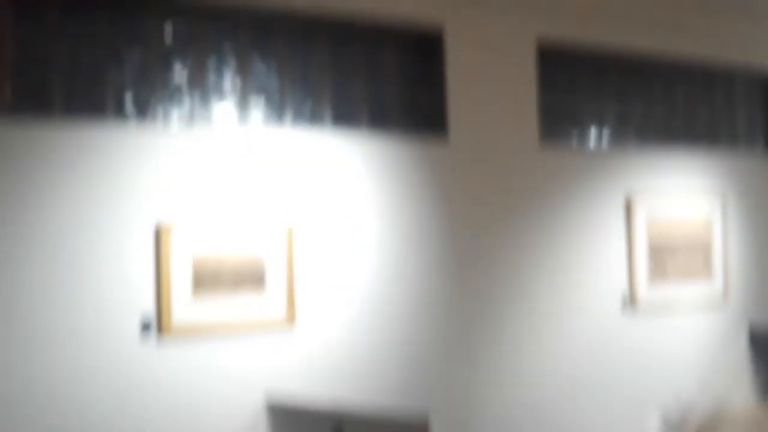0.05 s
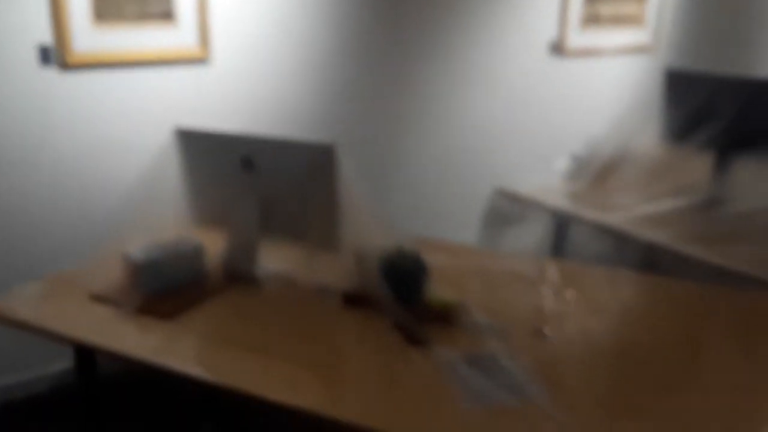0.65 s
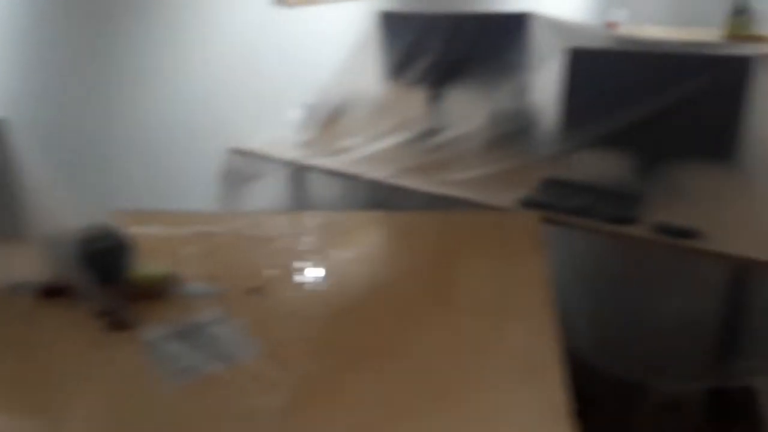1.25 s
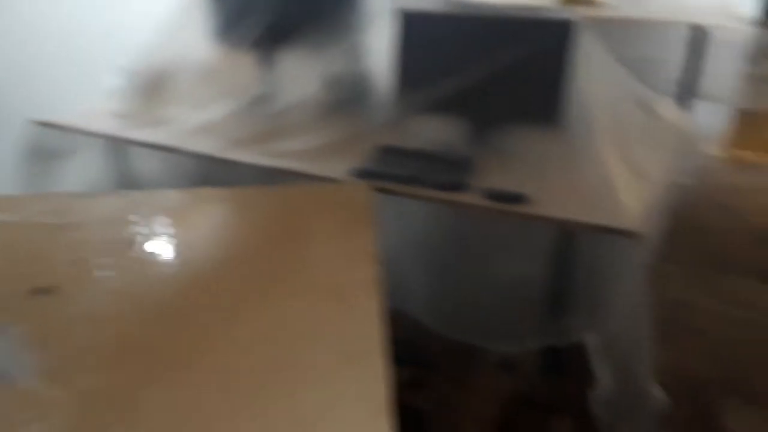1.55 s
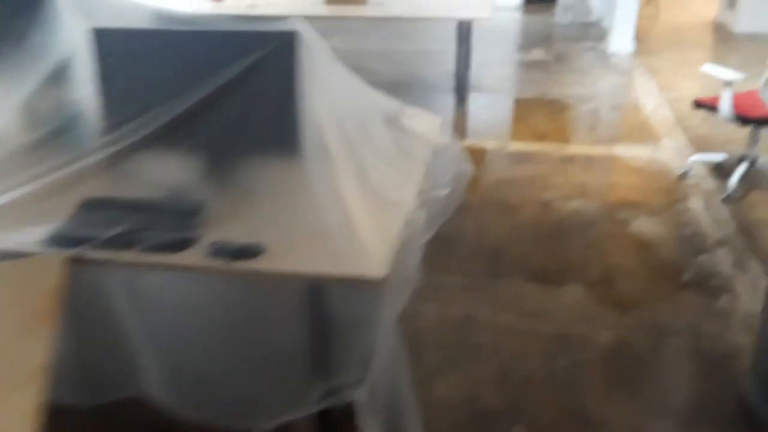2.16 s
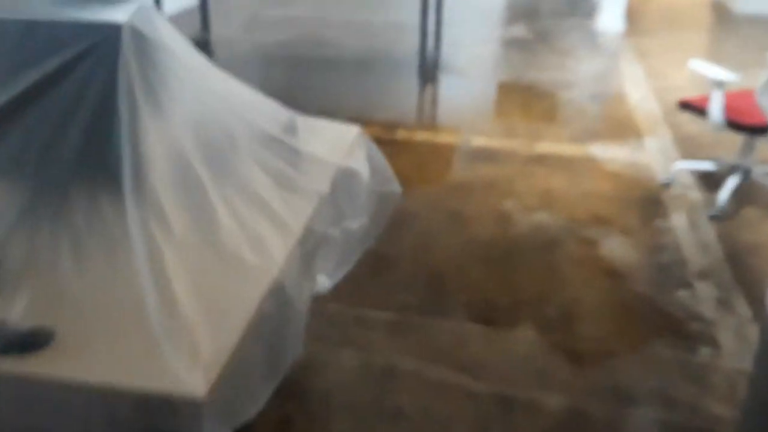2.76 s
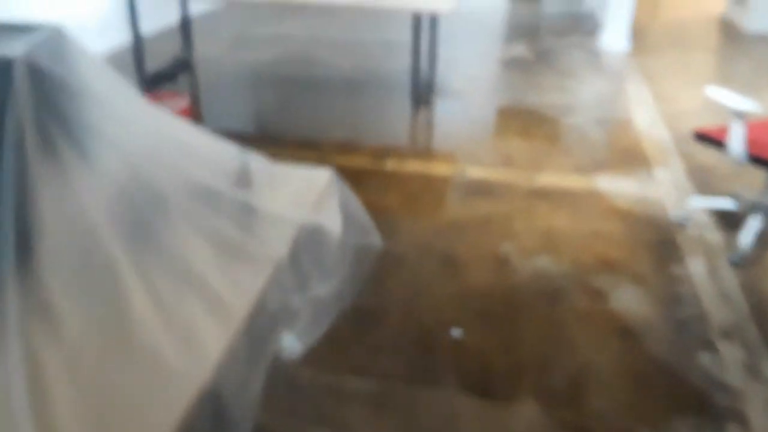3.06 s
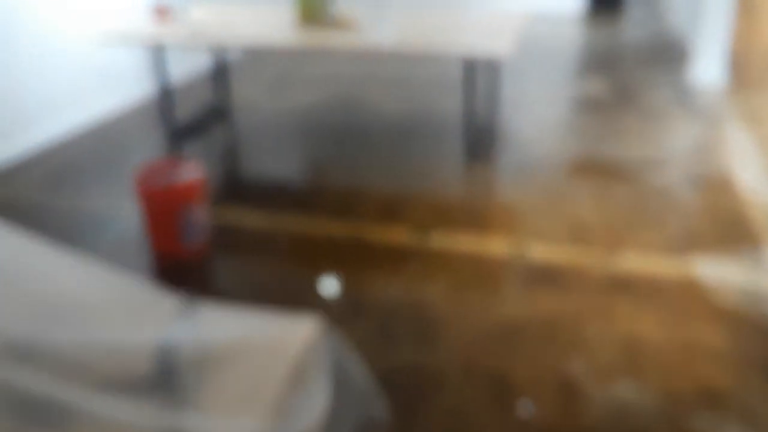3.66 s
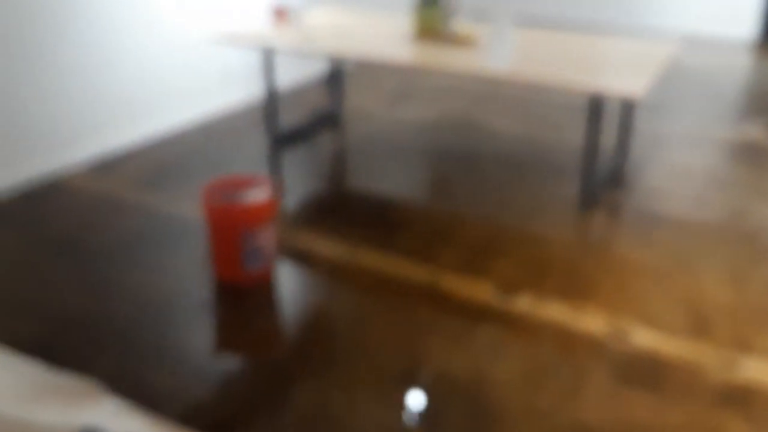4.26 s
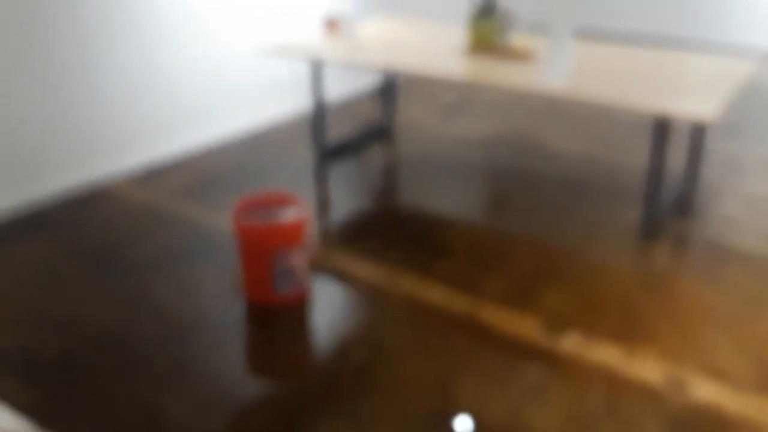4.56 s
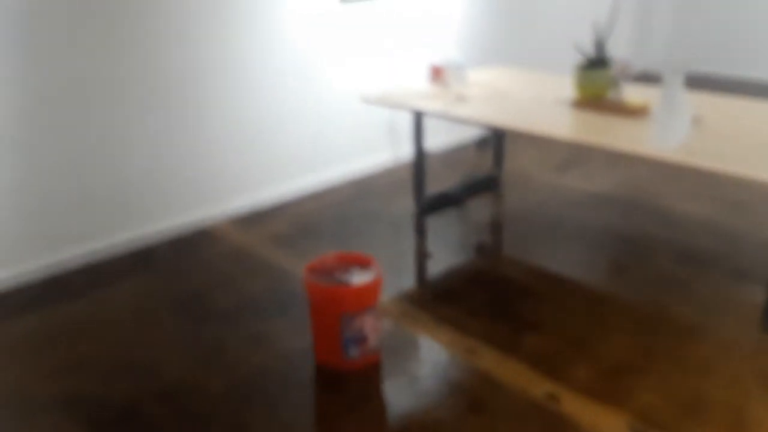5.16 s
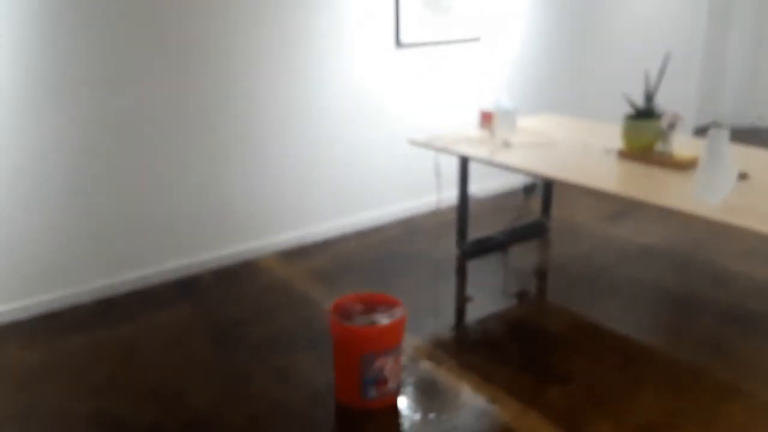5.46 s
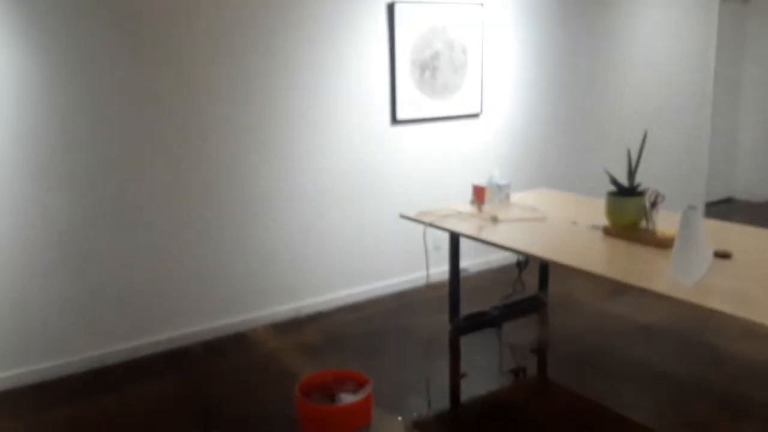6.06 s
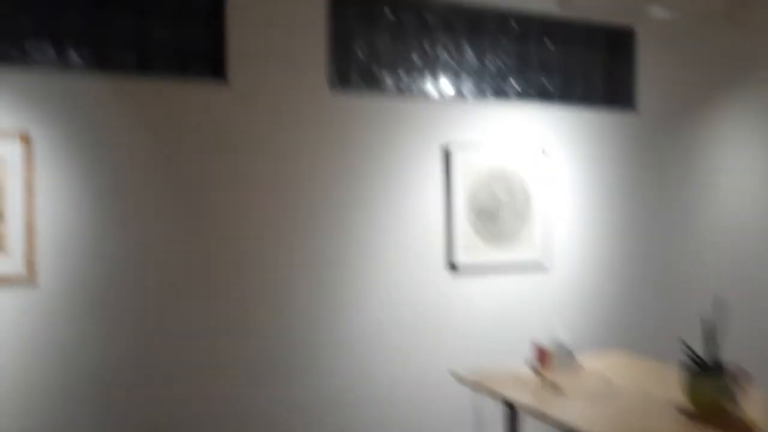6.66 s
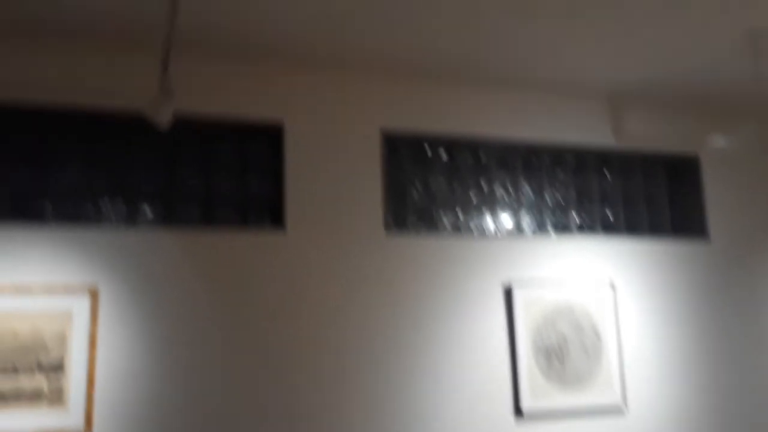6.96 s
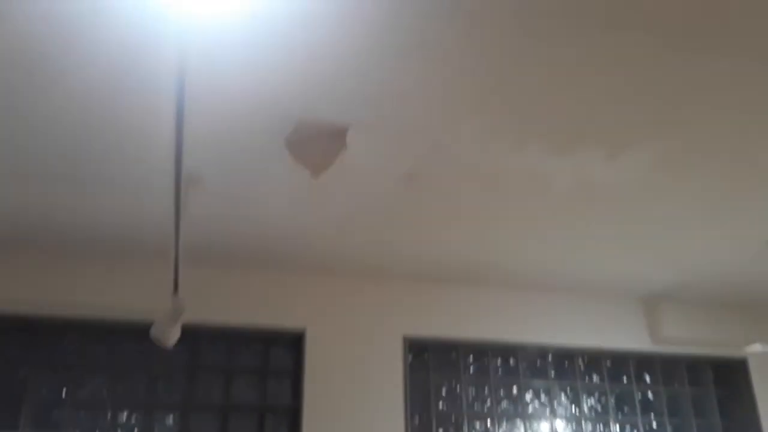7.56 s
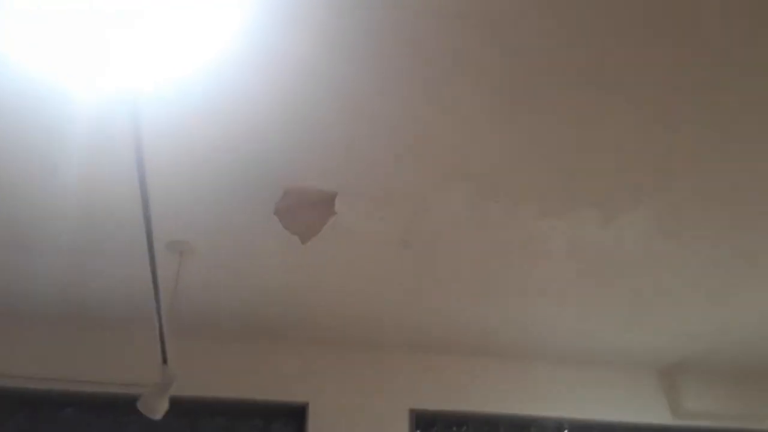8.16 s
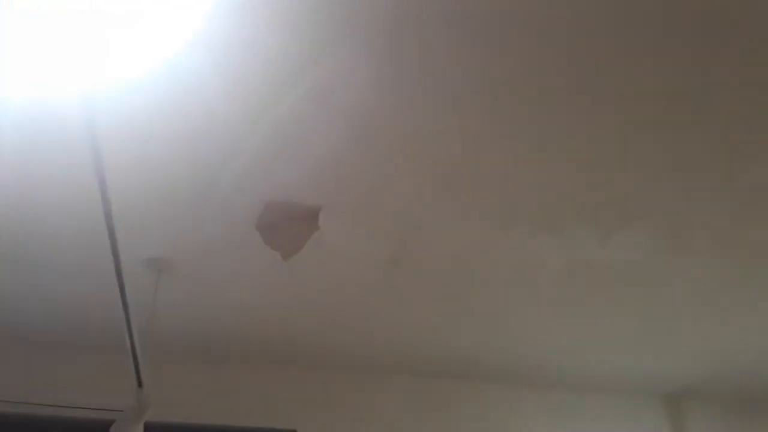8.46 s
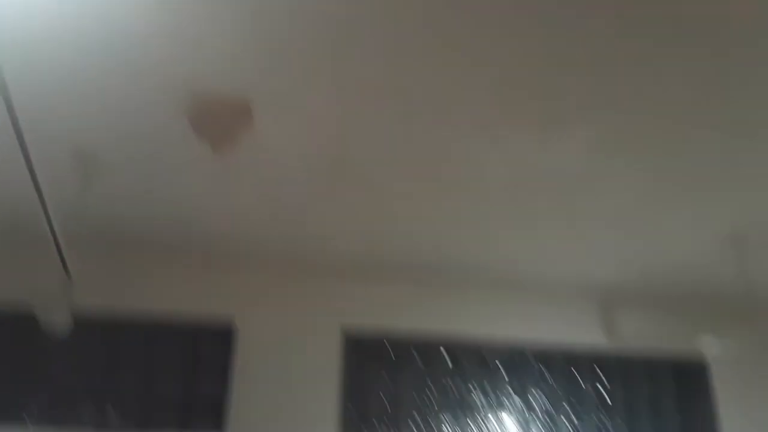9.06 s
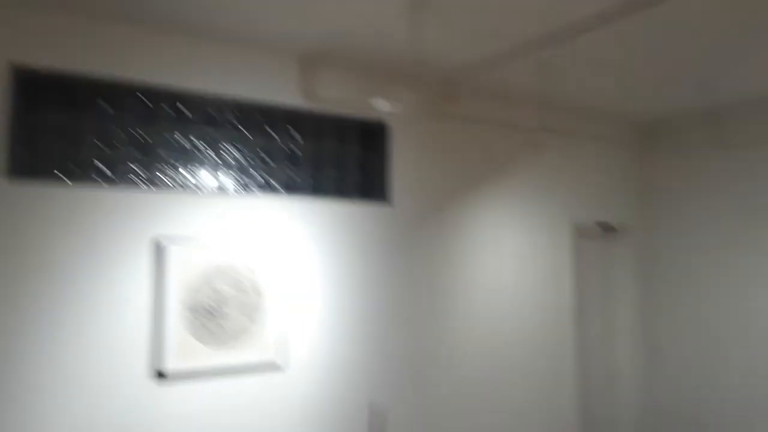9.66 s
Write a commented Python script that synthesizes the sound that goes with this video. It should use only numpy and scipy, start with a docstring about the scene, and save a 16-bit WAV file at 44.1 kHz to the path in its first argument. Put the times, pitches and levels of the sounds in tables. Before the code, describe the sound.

Water showers and spatters on a floor and plastic sheeting in a large room, with close drips and plinks into a bucket.

```python
"""A large, hard-floored room with a leaking ceiling, heard through a pair of microphones.
Ventilation rumbles and hums behind a far shower of water on the wet floor and plastic sheeting.
Across the room drops plink into a bucket, splashes drum on the sheeting and something squeaks once.
Heavier dribbles spatter in bursts and trap chirping bubbles in the puddles.
Close to the microphones, single drops tick on the plastic, slap the floor and smack."""
import sys
import numpy as np
from scipy import signal
from scipy.fft import rfft, irfft, next_fast_len
from scipy.io import wavfile

SR = 44100
rng = np.random.default_rng(int(sys.argv[2]) if len(sys.argv) > 2 else 0)


def to_wav(sig):
    """Store sig (one row per channel, or 1-D mono) as 16-bit WAV at the path in sys.argv[1].

    Samples outside -1..1 are clipped; the rate is SR.
    """
    pcm = np.clip(np.atleast_2d(sig), -1, 1) * 32767
    pcm = np.round(pcm).astype(np.int16)
    wavfile.write(sys.argv[1], SR, pcm.T)  # frames by channels


N = 437472
TIME = np.arange(N) / SR
SPATTER_LEAD_MS, FAR_DROP_PAN_DB = 0.33, -5   # spatter reaches the left microphone first; pan is left - right


def from_db(db):
    """Decibels to gain."""
    return 10 ** (np.asarray(db) / 20)


def unit_mid(x):
    """Scale a stereo sound so that its middle has rms 1."""
    return x / np.sqrt(np.mean(x.mean(0) ** 2) + 1e-20)


def in_time(rows):
    """The columns of a curve table at every sample."""
    times, *columns = np.transpose(rows)
    return [np.interp(TIME, times, column) for column in columns]


def at_hz(points, hz):
    """Read a table on a log-frequency axis."""
    f, value = np.transpose(points)
    return np.interp(np.log(hz + 1e-3), np.log(f), value)


def filtered(x, gain):
    """Apply a gain that is a function of frequency."""
    size = next_fast_len(N + 4096, True)
    return irfft(rfft(x, size) * gain(np.fft.rfftfreq(size, 1 / SR)), size)[..., :N]


def coloured(x, spectrum):
    """Shape a sound by a table of f/Hz, level/dB."""
    return filtered(x, lambda hz: from_db(at_hz(spectrum, hz)))


def bandpass(x, low_hz, high_hz):
    """One gently sloped band of a sound."""
    return signal.sosfilt(signal.butter(2, [low_hz, high_hz], "band", fs=SR, output="sos"), x)


def drift(rate_hz):
    """A slow random wander with spread 1."""
    hop, settle = 100, 1000
    pole = np.exp(-2 * np.pi * rate_hz * hop / SR)
    noise = rng.standard_normal(N // hop + settle + 2)
    slow = signal.lfilter([1], [1, -2 * pole, pole * pole], noise)[settle:]
    return np.interp(np.arange(N) / hop, np.arange(len(slow)), slow / slow.std())


def by_chance(per_s, mean_db, range_hz, spread_db):
    """Minor events at random moments: rows of t/s, level/dB, f/Hz."""
    when, size, pitch = rng.random((round(per_s * N / SR), 3)).T
    low, high = range_hz
    return list(zip(when * N / SR, mean_db + spread_db * (2 * size - 1), low * (high / low) ** pitch))


def impacts(per_s, spread_db, size=N):
    """Random droplet impacts of uneven strength, each from its own direction."""
    at = np.flatnonzero(rng.random(size) < per_s / SR)
    strength = np.minimum(rng.exponential(1, size)[at], 3.5)
    height = from_db(spread_db * strength) * rng.choice([-1, 1], size)[at]
    lag = rng.integers(-18, 19, size)[at]   # samples between the microphones
    out = np.zeros((2, size))
    out[0, at] = height
    out[1, (at + lag) % size] = height
    return out


def place(out, s, sound, pan_db=0, lead_ms=0):
    """Add a mono sound at a time and a side; the left microphone may hear it first."""
    sides = from_db(np.array([pan_db, -pan_db]) / 2)
    for channel, gain, early_s in zip(out, sides / sides.mean(), (lead_ms / 1000, 0)):
        at = min(max(round((s - early_s) * SR), 0), N)
        channel[at:at + len(sound)] += gain * sound[:N - at]


def ping(hz, t60, rise_s, glide=0):
    """A damped sine that swells briefly and climbs by a share of its pitch as it dies; peak 1."""
    t = TIME[:SR // 3]
    envelope = from_db(-60 * t / t60) * (1 - np.exp(-t / rise_s)) ** 2
    wave = envelope * np.sin(2 * np.pi * hz * t * (1 + glide * t / t60 / 2))
    return wave / np.abs(wave).max()


# how alike the two microphones hear far sound: f/Hz, correlation
MIC_LIKENESS = [(60, .92), (180, .93), (370, .88), (700, .76), (1000, .15), (1400, -.3), (2500, -.05),
                (5000, 0)]


def diffuse_noise():
    """Noise from all sides: alike at both microphones in the bass, unlike in the treble."""
    noise = rng.standard_normal((2, N))
    mid = filtered(noise[0], lambda hz: np.sqrt(1 + at_hz(MIC_LIKENESS, hz)))
    side = filtered(noise[1], lambda hz: np.sqrt(1 - at_hz(MIC_LIKENESS, hz)))
    return np.array([mid + side, mid - side])


# decay of the large room: f/Hz, t60/s
ROOM_DECAY = [(200, 0.35), (1000, 1), (3000, 0.95), (8000, 0.32), (16000, 0.2)]


def room(x, first_echo_s=0.0038):
    """Reverberation of unit energy: scattered early echoes thicken into a tail whose treble dies first."""
    t = TIME[:SR * 3 // 4]
    echoes = rng.standard_normal((2, len(t))) * (t > first_echo_s)
    echoes *= rng.random((2, len(t))) < .03 + (t / .08) ** 2
    echoes /= np.sqrt(np.minimum(0.012 + (t / 0.046) ** 2, 1))   # the early ones are stronger
    edges, response = np.geomspace(40, 18000, 8), 0
    for low, high in zip(edges, edges[1:]):
        t60 = at_hz(ROOM_DECAY, np.sqrt(low * high))
        response += bandpass(echoes, low, high) * from_db(-60 * t / t60)
    response /= np.sqrt((response ** 2).sum(1, keepdims=True))
    return signal.fftconvolve(x.mean(0, keepdims=True), response, axes=1)[:, :N]


def far_rings(rows, swell_share, direct_db, room_db, glide=0):
    """Pitched rings from across the room; the longer ones also swell more slowly."""
    out = np.zeros((2, N))
    for s, db, hz, t60 in rows:
        place(out, s, from_db(db) * ping(hz, t60, swell_share * t60, glide))
    return from_db(direct_db) * out + from_db(room_db) * room(out)


def smacks(rows, ring_cycles, rise_cycles, gain_db, room_db):
    """Drops land: each a short pitched pulse from its own side, then the room."""
    out = np.zeros((2, N))
    for s, db, hz, pan_db, lead_ms in rows:
        pulse = ping(hz, ring_cycles / hz, rise_cycles / hz)
        place(out, s, from_db(db + gain_db) * pulse, pan_db, lead_ms)
    return out + from_db(room_db) * room(out)


# ventilation, all around the microphones: f/Hz, relative level/dB
VENT_SPECTRUM = [(15, -56), (25, -30), (43, -32), (75, -11.5), (112, 1.5), (196, -1), (237, 2), (283, -1),
                 (346, 2), (520, -5), (680, -61), (1140, -120)]


def ventilation(rumble_db=-51.77, mains_hz=59.3, drone_hz=96, nearest_s=2.9, pass_s=1.3):
    """Steady air rumble; its hum swells and fades along the microphones' way through the room."""
    rumble = from_db(rumble_db) * unit_mid(coloured(diffuse_noise(), VENT_SPECTRUM))
    nearness = np.exp(-((TIME - nearest_s) / pass_s) ** 2)
    tones = [(mains_hz, -75 + 9 * nearness),
             (2 * mains_hz, -63.5 - 0.96 * TIME),   # the octave recedes slowly
             (drone_hz, -58.5 - 7 * TIME)]   # the drone is soon left behind
    hum = sum(from_db(db - drift(1.0)) * np.sin(2 * np.pi * hz * TIME) for hz, db in tones)
    return rumble + np.sqrt(2) * hum


# how hard the ceiling leaks: t/s, shower level/dB, drizzle relative level/dB
LEAK_FLOW = [(0.0, -34, -39.5), (0.44, -36, -50.5), (1.49, -37.5, -42.5), (2.57, -35.5, -44.5),
             (3.06, -36, -46), (4.69, -35.5, -47), (6.05, -37, -43), (6.27, -35, -47), (6.88, -36, -47),
             (7.76, -37.5, -40), (9.56, -35, -46), (9.92, -38, -43)]
# the shower, far off in the room: f/Hz, relative level/dB
SHOWER_SPECTRUM = [(30, -42), (250, -23), (540, -11.5), (720, -7), (1050, -5), (1400, -0.95), (1900, 1.5),
                   (2200, 2.5), (2550, 1), (3050, 2.5), (4100, -0.2), (4900, -2.6), (5750, -3), (8070, -11),
                   (9400, -17), (11460, -16), (13320, -15), (14980, -21)]


def shower(grain_db=-9.0, flicker_db=0.72):
    """Countless far drops merge into a wash; the nearer ones stay grains, each in a band of its own."""
    edges, grains = np.geomspace(900, 16000, 10), 0
    for low, high in zip(edges, edges[1:]):
        grains += bandpass(unit_mid(impacts(per_s=75, spread_db=4.0)) + 1e-18, low, high)
    wash = unit_mid(diffuse_noise()) + from_db(grain_db) * grains
    level_db = in_time(LEAK_FLOW)[0] + flicker_db * drift(8.0)
    return from_db(level_db) * unit_mid(coloured(wash, SHOWER_SPECTRUM))


# fine spray landing out in the room: f/Hz, relative level/dB
SPRAY_SPECTRUM = [(2000, -20.5), (3500, -2), (5000, 2), (6500, -1), (8000, -0.5), (9500, -10),
                  (12500, -5.5), (16000, -14)]


def drizzle(mean_db=-46, flow_follow=1.17, flicker_db=2.0):
    """The finest droplets fizz on the sheeting, louder and softer with the flow."""
    flow_db = in_time(LEAK_FLOW)[1]
    fizz = unit_mid(coloured(impacts(per_s=4000, spread_db=-0.5), SPRAY_SPECTRUM))
    return from_db(mean_db + flow_follow * (flow_db - flow_db.mean()) + flicker_db * drift(11.0)) * fizz


# splashes on the sheeting across the room: t/s, relative level/dB, f/Hz, t60/s
SHEETING_THUDS = [(2.246, -35.5, 660, 0.05), (2.262, -39, 400, 0.022), (2.265, -41, 243, 0.18),
                  (2.274, -36, 317, 0.07), (3.020, -42, 235, 0.13), (3.770, -41, 238, .15),
                  (6.25, -44, 391, .2), (7.0635, -29.5, 710, 0.012), (7.064, -29, 1210, 0.0073),
                  (7.110, -46, 64.6, .07), (8.129, -36, 1340, .015), (8.472, -28, 1120, .012),
                  (8.66, -46, 366, .25)]


def sheeting():
    """Heavy splashes set the plastic sheeting ringing like a slack drum."""
    return far_rings(SHEETING_THUDS, swell_share=0.05, direct_db=-4.0, room_db=-4.5)


# bucket and puddles across the room: t/s, relative level/dB, f/Hz, t60/s
BUCKET_PLINKS = [(2.270, -28, 1330, .04), (2.645, -22, 3050, 0.045), (2.688, -23, 2980, .05),
                 (3.165, -32, 860, 0.035), (3.594, -22.5, 3370, .06), (3.775, -37, 1010, 0.063),
                 (4.438, -28, 1360, 0.069), (4.624, -25, 876, 0.025), (4.634, -31, 1200, .03),
                 (4.638, -29, 1010, 0.035), (4.666, -35, 940, .05), (4.997, -22, 2400, .025),
                 (5.027, -24, 2280, .025), (5.045, -24, 2260, .03), (5.065, -26, 2230, .025),
                 (5.232, -21, 2200, .025), (5.262, -25, 2230, .025), (5.363, -29, 2250, 0.022),
                 (6.319, -22, 1850, .025), (6.408, -20, 2150, .03), (6.419, -21, 2060, .025),
                 (6.477, -29, 2140, .02), (6.539, -24, 2100, .02), (6.863, -25, 1347, 0.031),
                 (7.032, -24, 2780, 0.035), (8.130, -21, 2600, .025)]


def bucket():
    """Drops trap bubbles that ring and rise slightly in pitch."""
    return far_rings(BUCKET_PLINKS, swell_share=0.06, direct_db=-8.0, room_db=-11.5, glide=0.066)


def squeak(start_s=0.911, length_s=0.084, lowest_hz=694, swell_db=7, rough_db=4.0, room_db=-11):
    """A hollow squeak, as of a sole on the wet floor: it dips in pitch, swells and stops at once."""
    out = np.zeros((2, N))
    along = np.linspace(-1, 1, round(length_s * SR))
    hz = lowest_hz * (1 + .11 * along ** 4)
    level_db = -42 + swell_db * along + rough_db * drift(60)[:len(along)]
    envelope = from_db(level_db) * np.sqrt(1 - along ** 2)
    place(out, start_s, envelope * np.sin(2 * np.pi * np.cumsum(hz) / SR))
    return out + from_db(room_db) * room(out)


def spatter(grains, grain_share, colour):
    """One second of droplet impacts blended with smooth noise, then coloured."""
    wash = unit_mid(rng.standard_normal((2, SR)))
    blend = np.sqrt(grain_share) * unit_mid(grains) + np.sqrt(1 - grain_share) * wash
    return unit_mid(irfft(rfft(blend) * colour, SR))


# dribbles on floor and sheeting, out in the room: t/s, level/dB, f/Hz, spread/octaves, pouring/s
DRIBBLES = [(0.025, -33, 2540, 0.59, 0.018), (0.155, -44, 5680, 0.21, 0.027), (0.262, -37, 4150, 0.69, 0.2),
            (0.351, -35.5, 2230, 0.49, 0.0045), (0.703, -36, 3840, 0.74, 0.05),
            (0.83, -38.5, 2830, 0.7, 0.026), (0.898, -38.7, 2930, 0.19, 0.0),
            (1.174, -45, 4070, 0.53, 0.15), (1.322, -42, 4660, 0.37, 0.022),
            (1.701, -36.3, 2600, 0.37, 0.033), (1.945, -42, 2070, 0.45, 0.087),
            (2.085, -39, 1900, 0.31, 0.07), (2.219, -31.5, 2100, 0.46, 0.055),
            (2.425, -34.5, 2190, 0.69, 0.093), (2.521, -33.7, 2830, 0.66, 0.01),
            (2.64, -36, 2430, 0.51, 0.099), (2.75, -35.5, 2450, 0.54, 0.08),
            (3.368, -34.5, 3600, 0.48, 0.027), (3.59, -34.5, 2540, 0.84, 0.01),
            (3.68, -38.5, 2430, 0.49, 0.01), (3.76, -38, 2580, 0.91, 0.053),
            (3.949, -39, 3640, 0.23, 0.012), (4.135, -33.5, 2190, 0.53, 0.035),
            (4.172, -40.5, 2510, 0.83, 0.13), (4.412, -36, 3230, 0.82, 0.076),
            (4.503, -36.5, 2800, 0.35, 0.04), (4.645, -37, 3200, 0.31, 0), (4.76, -38.5, 2880, 0.28, 0.045),
            (4.987, -37.5, 2300, 0.2, 0.07), (5.2, -32.5, 3000, 0.72, 0.0089),
            (5.211, -37.5, 2250, 0.38, 0.09), (5.76, -48, 4900, 0.37, 0.0077),
            (6.06, -33, 2530, 0.67, 0.015), (6.14, -35, 2730, 0.53, 0.0016), (6.29, -35, 1970, 0.34, 0.16),
            (6.375, -40, 2140, 0.2, 0.05), (6.602, -35.5, 2860, 0.8, 0), (6.826, -44, 1770, 0.59, 0.079),
            (6.909, -41.5, 5500, .3, 0), (7.032, -38.5, 2000, 0.96, 0.05), (7.202, -38, 1960, 1.26, 0.055),
            (7.315, -39, 2100, 0.38, 0.078), (7.546, -42.2, 4800, 0.31, 0), (7.816, -41, 2140, 0.17, 0.0),
            (8.13, -42.5, 1970, 0.86, 0.039), (8.265, -42, 2160, 0.27, 0), (8.355, -42, 2290, 0.21, 0.16),
            (8.472, -45, 1700, 0.88, 0.11), (8.66, -45, 5830, 0.68, 0.0031), (8.957, -43, 2390, 0.3, 0.0),
            (9.152, -34, 3100, 0.59, 0.017), (9.483, -38, 4440, 0.64, 0.043),
            (9.655, -36, 3160, 0.76, 0.08), (9.835, -38.5, 3230, 0.5, 0.077)]


def dribbles(rise_s=0.0019, forerun_s=.003, scatter_s=0.092, splash_t60=1, spray_t60=0.82):
    """A dribble breaks into droplets: first heard one by one, then as the smooth wash of the room."""
    out, t = np.zeros((2, N + SR)), TIME[:SR]
    hz = np.fft.rfftfreq(SR, 1 / SR) + 1e-3
    swell = np.sqrt(1 - np.exp(-t / rise_s))
    distinct = np.exp(-t / scatter_s)
    spray_colour = from_db(at_hz(SPRAY_SPECTRUM, hz))
    thin = [(*row, 0.31, .02) for row in by_chance(3, -48, (1780, 5000), spread_db=6.5)]
    for s, db, pitch_hz, octaves, pour_s in DRIBBLES + thin:
        # droplets of like size splash around one pitch; the finest ones hiss far above it
        splash_colour = np.exp(-(np.log2(hz / pitch_hz) / octaves) ** 2 / 2)
        splash = spatter(impacts(per_s=400, spread_db=1.5, size=SR), 0.56 * distinct, splash_colour)
        spray = spatter(impacts(per_s=500, spread_db=2.0, size=SR), 0.98 * distinct, spray_colour)
        spray_db = -13.5 + 14 * np.log2(pitch_hz / 2820)   # finer splashes throw more spray
        dying_s = np.maximum(t - pour_s, 0)
        splash *= from_db(-60 * dying_s / splash_t60)
        spray *= from_db(spray_db - 60 * dying_s / spray_t60)
        at = max(round((s - forerun_s) * SR), 0)
        out[:, at:at + SR] += from_db(db) * swell * (splash + spray)
    return out[:, :N]


def bubbles(per_dribble=4, common_hz=(2185, 3054), detune_octaves=.09, linger_s=.09, spread_db=2.0):
    """Each heavier dribble traps a few bubbles in the puddles; they chirp briefly inside its splash."""
    rows = []
    for s, db, pitch_hz, octaves, pour_s in DRIBBLES:
        for when, size, kind, detune in rng.random((per_dribble, 4)):
            near_hz = pitch_hz * 2 ** (octaves * (2 * kind - 1))
            hz = min(common_hz, key=lambda common: abs(np.log(common / near_hz)))
            hz *= 2 ** (detune_octaves * (2 * detune - 1))
            start_s = s + when * (pour_s + linger_s)
            rows.append((start_s, db + spread_db * (2 * size - 1), hz, FAR_DROP_PAN_DB, SPATTER_LEAD_MS))
    return smacks(rows, ring_cycles=28, rise_cycles=2.0, gain_db=3.0, room_db=-2.0)


# spray on the plastic beside the right microphone: t/s, level/dB, length/s
MIST_PUFFS = [(0.152, -44, .03), (0.25, -42, .065), (1.185, -50, .04), (4.413, -51, .02)]
# its crackle from close up: f/Hz, relative level/dB
MIST_SPECTRUM = [(4000, -30), (7500, 1), (9500, -1), (13000, 0), (16000, -9)]


def mist(rise_s=.004, t60=.35, pan_db=-10):
    """Puffs of tiny droplets crackle on the nearest plastic and fade."""
    level = 0
    for s, db, length_s in MIST_PUFFS:
        t = np.maximum(TIME - s, 0)
        level += from_db(db - 60 * np.maximum(t - length_s, 0) / t60) * (1 - np.exp(-t / rise_s))
    crackle = coloured(impacts(per_s=2800, spread_db=2.5), MIST_SPECTRUM)
    crackle[0] *= from_db(pan_db)
    return level * unit_mid(crackle)


# droplets on plastic close to the microphones, with the bright crack of the big drops at 0.029 s and 8.957 s:
# t/s, relative level/dB, f/Hz, pan/dB
PLASTIC_TICKS = [(0.0291, -30, 5600, 1), (0.154, -39, 8000, -11), (0.3515, -43, 6000, -2),
                 (0.690, -41, 12900, -15), (0.7363, -44, 6500, -4), (0.892, -43, 14000, -9),
                 (1.174, -46, 6500, -7), (1.191, -43, 12000, -10), (1.324, -42, 7500, -8),
                 (1.660, -43, 10000, -11), (1.9725, -43, 6400, -8), (2.1194, -37, 6040, -9),
                 (2.1196, -34, 12400, -18), (2.4178, -37, 14000, -14), (2.701, -42, 13000, -9),
                 (3.184, -43, 11500, -10), (4.303, -44, 6500, -4), (4.4125, -39, 6000, -1),
                 (4.4208, -43, 7500, -5), (5.384, -41, 12500, -6), (5.560, -48, 6440, -3),
                 (5.7737, -40, 6500, -3), (6.6035, -40, 6200, -3), (6.9093, -43, 6300, -4),
                 (7.5467, -41, 6000, -3), (7.7953, -49, 6300, -5), (8.029, -42, 6500, -2),
                 (8.1284, -43, 6000, -4), (8.6706, -43, 6500, -4), (8.9572, -37, 5000, 11),
                 (9.240, -38, 13500, -2), (9.483, -42, 6500, -11), (9.833, -44, 12500, -10)]


def ticks(faint_pan_db=-11):
    """Droplets tick on the plastic: sharp ones close by, faint ones further off all the time."""
    near = [(*row, SPATTER_LEAD_MS) for row in PLASTIC_TICKS]
    faint = [(*row, faint_pan_db, 0) for row in by_chance(3.9, -38.5, (6000, 13500), spread_db=12.0)]
    return (smacks(near, ring_cycles=9.0, rise_cycles=1.2, gain_db=20.0, room_db=-3.0)
            + smacks(faint, ring_cycles=9.2, rise_cycles=1.3, gain_db=3.5, room_db=-3.0))


# dribbles landing flat on the floor close by: t/s, relative level/dB, f/Hz, pan/dB
FLOOR_SLAPS = [(0.0286, -15.5, 1700, 2), (0.7030, -15, 3200, -7), (0.9, -14.5, 3050, -7),
               (1.7016, -24, 2780, -7), (2.218, -17, 2000, -9), (2.5224, -13, 2900, -13),
               (3.3710, -14, 3700, -9), (3.5995, -19, 3000, -7), (3.949, -26, 2500, -3),
               (4.135, -22, 2500, -5), (4.176, -19, 2700, -6), (4.5189, -16, 3090, -10),
               (4.991, -19, 2470, -7), (5.199, -20, 3320, -5), (5.2112, -15, 3100, -10),
               (6.0568, -23, 2200, -5), (6.07, -12.5, 2800, -6), (6.292, -20, 2100, -6),
               (6.6034, -18, 3700, 0), (7.0645, -24, 2900, -3), (7.202, -25, 3400, -4),
               (8.0284, -14, 4200, 1)]


def slaps(fragments=4, scatter_s=0.026, fragment_db=-9, fading_db=10.0, spread_octaves=0.43):
    """The head of a dribble cracks on the wet floor and scatters droplets, the later ones weaker."""
    hits = list(FLOOR_SLAPS)
    for s, db, hz, pan_db in FLOOR_SLAPS:
        for late, fine in rng.random((fragments, 2)):
            fragment_hz = hz * 2 ** (spread_octaves * (2 * fine - 1))
            hits.append((s + scatter_s * late, db + fragment_db - fading_db * late, fragment_hz, pan_db / 2))
    rows = [(*hit, SPATTER_LEAD_MS) for hit in hits]
    return smacks(rows, ring_cycles=3.7, rise_cycles=1.2, gain_db=-1.0, room_db=-3.0)


# big drops near the microphones: t/s, relative level/dB, f/Hz, pan/dB, left microphone's lead/ms
NEAR_DROPS = [(0.0283, -6, 2730, 0, .36), (0.0360, -5, 3180, -1, 0.4), (0.038, -16, 2900, -1, .36),
              (0.046, -14, 2800, -3, 0.28), (0.3509, -9.5, 2440, -2, .38), (2.030, -23, 1630, -3, 0.042),
              (2.221, -11, 2300, -11, .45), (2.2352, -13, 2400, -10, 0), (2.2445, -17, 2200, -3, 0),
              (3.683, -21, 2200, -2, 0), (3.754, -27, 2100, -2, 0), (3.990, -24, 2220, -4, 0),
              (6.3818, -21, 2150, -6, 0), (6.404, -17, 2230, -10, 0), (6.826, -22, 1920, -3, 0),
              (7.0625, -23, 1700, -2, 0), (7.333, -24, 2250, -4, 0), (7.816, -7.5, 2240, 0, 0),
              (7.8505, -22, 2490, -6, 0), (8.1288, -17, 1870, 3, 0.071), (8.1315, -20, 1900, 0, 0),
              (8.266, -19, 2350, -4, 0.056), (8.293, -21, 2040, -3, 0), (8.425, -16, 2040, -3, 0.048),
              (8.472, -14, 2200, -4, .4), (8.4822, -24, 2150, 0, 0), (8.529, -16, 2300, -3, 0),
              (8.599, -17, 2510, -2, 0), (8.7537, -18, 2570, -3, 0), (8.957, -14, 2140, 3, 0.029),
              (9.1518, -5.5, 2880, -2, 0), (9.655, -19, 2100, 0, 0.078)]


def drops(rebound_s=0.0076, rebound_db=-12, rebound_pitch=1.06):
    """Big drops smack close by, each followed a moment later by a fainter, slightly higher repeat; further off,
    lone ones fall."""
    rebounds = [(s + rebound_s, db + rebound_db, hz * rebound_pitch, *side)
                for s, db, hz, *side in NEAR_DROPS]
    lone = [(*row, FAR_DROP_PAN_DB, SPATTER_LEAD_MS)
            for row in by_chance(6.8, -31, (1880, 3570), spread_db=1.0)]
    return (smacks(NEAR_DROPS + rebounds, ring_cycles=6.6, rise_cycles=2.3, gain_db=-5.0, room_db=-8.5)
            + smacks(lone, ring_cycles=6.5, rise_cycles=1.4, gain_db=-0.5, room_db=-2.0))


# left microphone against right, for far sound: f/Hz, level/dB
MIC_BALANCE = [(60, 0.5), (330, -0.8), (600, 0), (1170, -1.0), (1700, -1.5), (2450, -6.5), (3100, -3),
               (4300, -1), (5800, -0.8), (7000, -6), (8800, -19.5), (12500, -9.5), (15000, -7.5)]


def microphone_gains(hz):
    """Left and right gains that tilt the balance at constant total power."""
    ratio = from_db(at_hz(MIC_BALANCE, hz))
    return np.array([ratio, np.ones_like(hz)]) * np.sqrt(2 / (1 + ratio ** 2))


def scene():
    """The far water and air take the colour of each microphone; near drops keep their own side."""
    far = bucket() + sheeting() + shower() + drizzle() + dribbles() + ventilation() + squeak()
    return filtered(far, microphone_gains) + drops() + slaps() + bubbles() + ticks() + mist()


def record(dry):
    """The top is cut steeply just under 16 kHz."""
    return signal.sosfilt(signal.ellip(12, .1, 80, 15950, fs=SR, output="sos"), dry)


dry = scene()
out = record(dry)
to_wav(out)
```